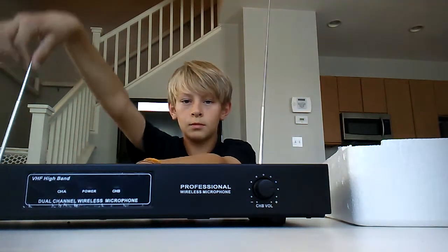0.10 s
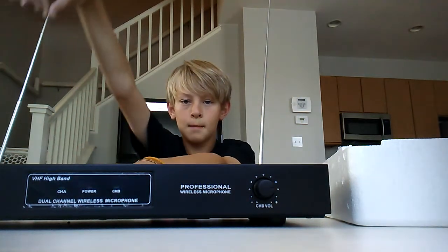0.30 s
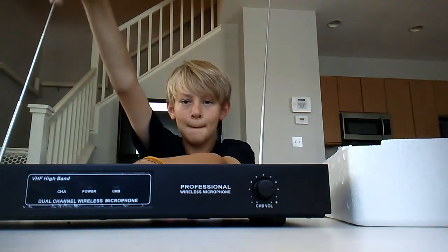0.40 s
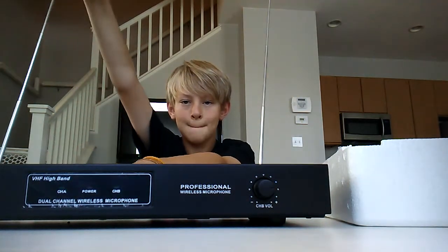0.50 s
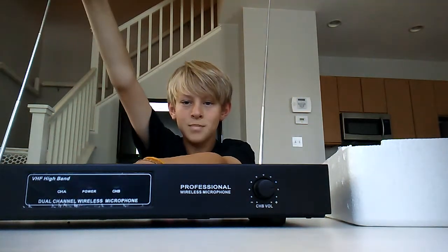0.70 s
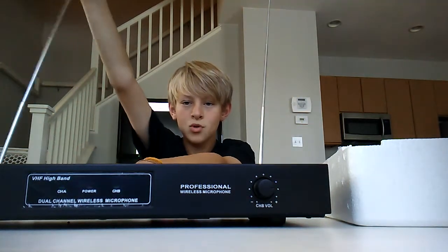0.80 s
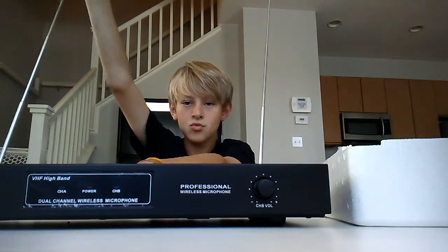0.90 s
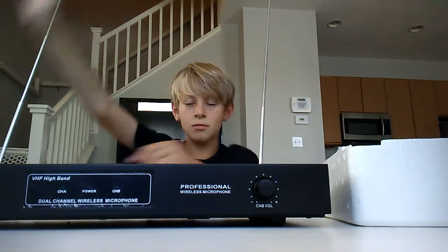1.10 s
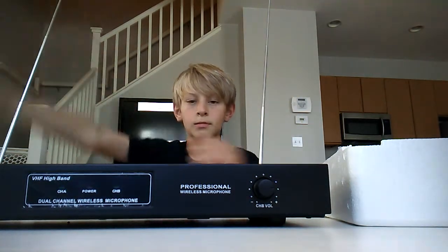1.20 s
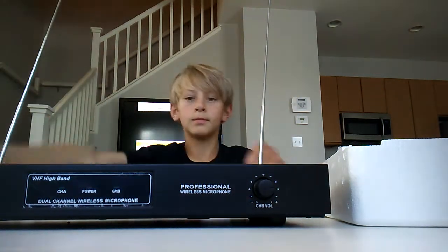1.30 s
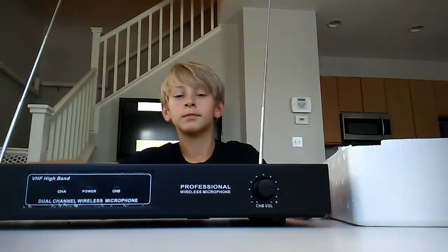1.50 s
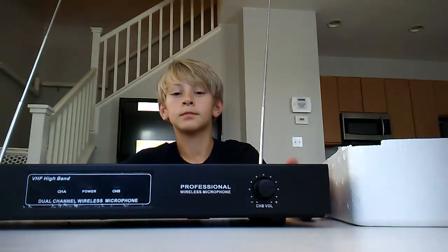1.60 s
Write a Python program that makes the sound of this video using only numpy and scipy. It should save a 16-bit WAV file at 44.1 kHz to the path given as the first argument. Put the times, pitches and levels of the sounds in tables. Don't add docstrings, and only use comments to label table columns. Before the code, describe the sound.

Close up in a quiet open room, thin metal tubes slide with a raspy hiss, snap loudly, slide again more faintly and click, followed by low thuds on the table and light hand rubs.

```python
import sys
import numpy as np
from scipy import signal
from scipy.fft import rfft, irfft, next_fast_len
from scipy.io import wavfile

SR = 44100
rng = np.random.default_rng(int(sys.argv[2]) if len(sys.argv) > 2 else 0)


def log_audio(samples):
    frames = np.atleast_2d(samples).T
    limited = np.clip(frames, -1, 1)
    pcm = np.round(limited * 32767).astype(np.int16)
    wavfile.write(sys.argv[1], SR, pcm)


def ratio(d):
    e = np.asarray(d, float) / 20
    return 10 ** e


N = 74970
TIME = np.arange(N) / SR

# f/Hz, level/dB
FLOOR_SPECTRUM = [(18, -24), (30, 0), (616, -14.5), (740, -16.5), (1810, -25), (14400, -30), (16000, -37)]
FLOOR_DB = -63.5
RUMBLE_DB, RUMBLE_HZ = -61, 110
# t/s, level/dB
MIC_HISS = [(0, -86), (0.098, -84), (.2, -65), (.35, -61), (.5, -68), (.78, -74), (.9, -66), (1.0, -77.5),
            (1.04, -77), (1.1, -65.5), (1.2, -72), (1.36, -87), (1.45, -93), (1.49, -74), (1.7, -73)]
HISS_FROM_HZ, HISS_TRIM_DB = 2900, -3

# t/s, case buzz level/dB, tube hiss level/dB
STROKES = [
    [(0.0, -46, -60), (0.02, -51, -62.5), (0.03, -47, -59.5), (0.068, -46, -54), (0.17, -52.5, -47.5),
     (0.184, -48, -48), (0.328, -45, -43.5), (0.338, -49, -49.5)],
    [(0.4, -44.5, -50.5), (0.426, -48, -46.5), (0.514, -48, -58), (0.556, -48, -54.5), (0.59, -48.5, -58.5),
     (0.664, -50.5, -53), (0.718, -50, -56.5), (0.798, -45, -49)],
]
# f/Hz, width/Hz, level/dB
CASE = [(205, 20, -7), (270, 30, -8.5), (318.6, 17.8, 3), (440, 31, -5.5), (497, 23, -8.5),
        (639.6, 19, -3.5), (818, 40, -5.5), (936, 63, -2.5), (1077, 61, -4.5), (1208, 152, -6.5)]
THICK_TUBE = [(1692, 63, -2), (2230, 130, 0), (2890, 105, -5), (3660, 73, -2.5), (4390, 120, -2.5),
              (5050, 160, -6), (6000, 67, 1), (6840, 360, -1.5), (7250, 74, 0), (7940, 42, -4),
              (8350, 170, -8), (8960, 300, -12)]
THIN_TUBE = [(1902, 56, -12), (2760, 280, -19.5), (3520, 140, -21), (3760, 48, -13), (4490, 260, -11.5),
             (6100, 51, -5), (6540, 150, 1), (6760, 230, -9), (7700, 65, -14), (7700, 100, -18),
             (8000, 66, -26), (8870, 110, -19)]
# f/Hz, level/dB per Hz
THICK_HISS = [(880, -25), (1500, -4.5), (2830, -5), (3310, -4), (3860, 3.5), (4720, -6.5), (6810, -6),
              (15000, -24.5)]
THIN_HISS = [(880, -49), (1500, -21), (2890, -5), (3780, -17), (4460, -3.5), (5400, -28), (6610, -3),
             (15000, -29)]
BROAD_DB, BUZZ_BED_DB, CASE_TOP_HZ = -1.5, -8, 1410
OPEN_FROM_HZ, OPEN_S = 4270, 0.16
GRAINS_PER_S, GRAIN_SPREAD_DB, PATCHY_DB = 4000, 3, 3

# t/s, level/dB, f/Hz, release/s per 20 dB
CATCHES = [(.0, -46, 325, .09), (.024, -42, 1000, .03), (.027, -54, 2820, .02), (.158, -47, 3650, .02),
           (.178, -46, 5030, .015), (.178, -49, 6800, .015), (.172, -55, 3000, .04), (.198, -45, 5070, .02),
           (.2, -45, 6800, .015), (.229, -42, 2860, .025), (.229, -47, 8800, .04), (.283, -47, 6600, .04),
           (.3, -44, 3800, .06), (.3475, -23, 6600, .007), (.351, -33, 420, .05), (.354, -33, 4100, .012),
           (.361, -33, 5900, .02), (.362, -37, 6900, .02), (.378, -42, 6900, .02), (.377, -46, 4700, .015),
           (.391, -44, 6700, .012), (.417, -49, 8900, .04), (.418, -44, 4600, .015), (.41, -62, 12400, .1),
           (.458, -46, 6200, .06), (.475, -52, 4500, .04), (.474, -63, 12300, .02), (.546, -51, 8800, .015),
           (.549, -57, 3050, .07), (.562, -53, 4900, .02), (.56, -52, 6900, .015), (.602, -52, 6600, .04),
           (.612, -56, 4450, .08), (.62, -61, 2750, .2), (.658, -55, 6000, .02), (.666, -56, 8900, .015),
           (.683, -55, 3450, .02), (.741, -55, 6600, .04), (.76, -54, 4850, .08), (.77, -49, 6750, .1),
           (.808, -40, 2035, .012), (.808, -41, 4100, .012), (.807, -41, 3100, .01),
           (.811, -33, 1150, .016), (.824, -41, 1100, .03), (.807, -42, 7000, .012), (1.255, -62, 610, .06)]
CATCH_Q, CATCH_ATTACK_S = 11.0, .003

# t/s, level/dB, hardness f/Hz
BUMPS = [(0.011, -42, 40), (.11, -47.5, 45), (0.356, -42, 253), (.64, -62, 90), (.81, -47, 100),
         (.855, -41.5, 151), (.874, -32.5, 314), (.883, -31, 398), (.9, -50, 900), (.914, -40.5, 154),
         (.95, -54, 102), (1.022, -45.5, 404), (1.035, -43.5, 420), (1.06, -46, 450), (1.072, -51.5, 700),
         (1.09, -48, 150), (1.17, -56.5, 100), (1.26, -59, 700), (1.291, -55, 100), (1.472, -53.5, 246),
         (1.485, -48, 149), (1.56, -60, 150), (1.599, -42, 650), (1.651, -49.5, 302), (1.662, -42.5, 500),
         (1.685, -50, 200)]
# f/Hz, level/dB, t60/s
TABLE_MODES = [(49.7, -5, 0.21), (76.2, -2.5, 0.29), (111, -0.5, 0.063), (176, 0.5, .08),
               (260, -5.5, 0.095), (320, -5, .1), (441, -8, 0.16), (500, -2, 0.11), (641, -6.5, 0.076),
               (955, 0, .05)]
SCUFF_DB, SCUFF_T60_S, SCUFF_HZ = -16, 0.13, 900

# t/s, peak level/dB, brightness/dB
STOPS = [(.0255, -38, -10), (0.229, -37.5, 10), (0.3492, -14, 3.5), (0.3532, -22, -1), (.3505, -18, 2),
         (.363, -23, -5), (.417, -37.5, 6), (.475, -52, 8), (.548, -49, 11.5), (0.8072, -22.5, -2.5),
         (0.8108, -26, -3), (.8205, -33, -11)]
# f/Hz, level/dB, t60/s
STOP_MODES = [(320, -11.5, 0.12), (500, -11, 0.045), (634, -12.5, 0.042), (897, -13.5, 0.055),
              (1080, -12.5, 0.08), (1195, -9, 0.024), (1476, -15, 0.016), (2014, -11, 0.011),
              (2807, -14, 0.0075), (3900, -19, 0.012), (4500, -21.5, 0.019), (5750, -19, 0.033),
              (6470, -12.5, 0.019), (7390, -13, 0.009)]
CRACK_DB, CRACK_S = -10.5, 0.0022
TAIL_DB, TAIL_T60_S = -25, 0.19
RATTLE_DB, RATTLE_T60_S = -33, 0.14

# t/s, attack/s, release/s per 20 dB (negative swells), level/dB, brightest f/Hz
BRUSHES = [
    (1.05, .05, .2, -68, 7300),
    (1.118, 0.022, 0.05, -58, 3200),
    (1.46, 0.032, .3, -72.5, 4000),
    (1.53, 0.056, -2.5, -66, 2900),
    (1.595, .01, 0.1, -55.5, 8100),
    (1.603, 0.025, 0.025, -54, 3900),
    (1.645, 0.006, .03, -60, 4100),
    (1.662, .018, .12, -56, 3800),
]
# f/Hz, level/dB
BRUSH_SPECTRUM = [(500, -13), (900, -7), (2100, -9), (2600, -10), (3600, -2), (7500, -1.5), (10000, -5.5),
                  (15500, -18)]
BRUSH_PEAK_DB, BRUSH_Q = 0.1, 3.8

ROOM_T60_S, ROOM_DB, WALL_CUT_HZ = 0.55, -18, 2530
MIC_LOW_HZ, MIC_TOP_HZ = 40, 16050


def unit(x):
    return x / np.sqrt(np.mean(x ** 2) + 1e-20)


def noise():
    return rng.standard_normal(N)


def drift(rate):
    r = np.exp(-2 * np.pi * rate / SR)
    return unit(signal.lfilter([1], [1, -2 * r, r * r], rng.standard_normal(N + SR))[SR:])


def cut(x, hz, kind, order=2):
    return signal.sosfilt(signal.butter(order, hz, kind, fs=SR, output="sos"), x)


def ring(x, hz, t60):
    r, w = ratio(-60 / (t60 * SR)), 2 * np.pi * hz / SR
    return signal.lfilter([0, np.sin(w)], [1, -2 * r * np.cos(w), r * r], x + 1e-18)


def coloured(x, spectrum):
    hz, db = np.transpose(spectrum)
    bins_hz = np.arange(N // 2 + 1) * SR / N + 1
    return unit(irfft(rfft(x) * ratio(np.interp(np.log(bins_hz), np.log(hz), db)), N))


def clicks(s, gain):
    return np.bincount((np.asarray(s) * SR).astype(int), gain, minlength=N)


def fading(s, gain, t60):
    return signal.lfilter([1], [1, -ratio(-60 / (t60 * SR))], clicks(s, gain))


def burst(s, attack, release, db):
    level = ratio(db - 20 * np.maximum(TIME - s, 0) / release)
    return level * np.clip((TIME - s) / attack, 0, 1)


def grains():
    sizes = ratio(GRAIN_SPREAD_DB * np.minimum(rng.exponential(1, N), 5)) * rng.choice([-1, 1], N)
    slips = rng.random(N) < GRAINS_PER_S / SR
    return unit(sizes * slips) + .5 * noise()


def body(peaks):
    friction = grains()
    out = 0
    for k, (hz, width, db) in enumerate(peaks):
        patchy = drift(14.3) + 0.64 * drift(4.9) * (hz > 1500)
        tone = unit(ring(friction, hz, 3.03 / width))
        out = out + ratio(db + PATCHY_DB * patchy) * np.sqrt(width) * tone * (-1) ** k
    return unit(out)


def room_floor():
    return ratio(FLOOR_DB + 1.0 * drift(4)) * coloured(noise(), FLOOR_SPECTRUM)


def rumble():
    low = unit(cut(cut(noise(), RUMBLE_HZ, "low"), 46, "high"))
    return ratio(RUMBLE_DB + 2.1 * drift(7.3)) * np.clip((1.3 - TIME) / 0.19, 0, 1) * low


def mic_hiss():
    s, db = np.transpose(MIC_HISS)
    return ratio(np.interp(TIME, s, db) + HISS_TRIM_DB) * cut(noise(), HISS_FROM_HZ, "high") * 2


def sliding():
    bed = unit(cut(grains(), 270, "high"))
    bed = unit(cut(bed, CASE_TOP_HZ, "low"))
    buzz = unit(cut(body(CASE) + ratio(BUZZ_BED_DB) * bed, CASE_TOP_HZ, "low", order=8))
    out = 0
    for rows, peaks, spectrum in zip(STROKES, (THICK_TUBE, THIN_TUBE), (THICK_HISS, THIN_HISS)):
        s, case_db, tube_db = np.transpose(rows)
        broad = ratio(BROAD_DB) * coloured(grains(), spectrum)
        tube = unit(cut(body(peaks) + broad, 1380, "high", order=4))
        dull = cut(tube, OPEN_FROM_HZ, "low", order=4)
        opening = np.clip(TIME / OPEN_S, 0, 1) ** 3.1
        tube = dull + (tube - dull) * opening * ratio(1.25 * drift(47))
        start = np.clip((TIME - s[0] + 0.073) / 0.031, 0, 1)
        end = np.clip((s[-1] + .014 - TIME) / 0.0034, 0, 1)
        rub = buzz * ratio(np.interp(TIME, s, case_db)) + tube * ratio(np.interp(TIME, s, tube_db))
        out = out + start * end * rub
    return out


def catches():
    grit = grains()
    out = 0
    for s, db, hz, release in CATCHES:
        t60 = 2.2 * CATCH_Q / hz
        tone = unit(ring(ring(grit, hz, t60), hz, t60))
        out = out + burst(s, CATCH_ATTACK_S, release, db) * tone
    return out


def bumps():
    s, db, hard_hz = np.transpose(BUMPS)
    chance = rng.normal(0, 1.56, (len(s), len(TABLE_MODES)))
    out = 0
    for k, (hz, level, t60) in enumerate(TABLE_MODES):
        softness = 1 / (1 + (hz / hard_hz) ** 2.64)
        brief = (hard_hz / 200) ** -np.clip(200 / hz - .5, 0, 1)
        hits = clicks(s, ratio(db + level + chance[:, k]) * softness * brief)
        out = out + ring(hits, hz, t60) * (-1) ** max(k - 2, 0)
    scuff = unit(cut(cut(grains(), SCUFF_HZ, "low"), 200, "high"))
    return cut(out, 1900, "low") + fading(s, ratio(db + SCUFF_DB) * hard_hz / 400, SCUFF_T60_S) * scuff


def stops():
    s, db, bright = np.transpose(STOPS)
    chance = rng.normal(0, 2.1, (len(s), len(STOP_MODES)))
    modes = 0
    for k, (hz, level, t60) in enumerate(STOP_MODES):
        tilt = bright * np.log2(hz / 1500) / 2
        hits = clicks(s, ratio(db + level + chance[:, k] + tilt) * (-1) ** k)
        modes = modes + ring(hits, hz, t60)
    crack = cut(cut(noise(), 6500, "low"), 1350, "high")
    crack = crack * ratio(CRACK_DB) * fading(s, ratio(db + bright), 7 * CRACK_S)
    rattle = ratio(2.5 * drift(46)) * coloured(grains(), THICK_HISS)
    rattle = rattle * ratio(RATTLE_DB) * fading(s, ratio(db + bright), RATTLE_T60_S)
    tail = ratio(TAIL_DB) * fading(s, ratio(db), TAIL_T60_S) * body(CASE)
    return modes + crack + rattle + tail


def brushes():
    rub = coloured(0.68 * grains() + noise(), BRUSH_SPECTRUM)
    out = 0
    for s, attack, release, db, hz in BRUSHES:
        bright_spot = ratio(BRUSH_PEAK_DB) * unit(ring(rub, hz, 1.95 * BRUSH_Q / hz))
        rise = np.clip((TIME - s) / attack, 0, 1)
        fall = ratio(db - 20 * np.maximum(TIME - s - attack, 0) / release)
        out = out + rise * fall * (rub + bright_spot)
    return out


def room(x):
    size = next_fast_len(N + SR)
    hz = np.arange(size // 2 + 1) * SR / size
    t60 = ROOM_T60_S / (1 + hz / WALL_CUT_HZ)
    response = 0
    for k, lag in enumerate(rng.uniform(.02, .055, 10)):
        loop = ratio(-60 * lag / t60) * np.exp(-2j * np.pi * hz * lag)
        response = response + loop / (1 - loop) * (-1) ** k
    return irfft(rfft(x, size) * response, size)[:N]


def scene():
    background = room_floor() + rumble() + mic_hiss()
    table_top = sliding() + catches() + bumps() + stops()
    hands = brushes()
    reflections = ratio(ROOM_DB) * room(table_top + .4 * hands)
    return (table_top + hands + reflections + background)[None]


def roll_off(x):
    return signal.sosfilt(signal.butter(12, 16470, fs=SR, output="sos"), x)


def record(dry):
    top = signal.cheby2(12, 50, MIC_TOP_HZ, fs=SR, output="sos")
    mix = signal.sosfilt(top, cut(dry, MIC_LOW_HZ, "high", order=3))
    return roll_off(mix)


dry = scene()
out = record(dry)
log_audio(out)
```